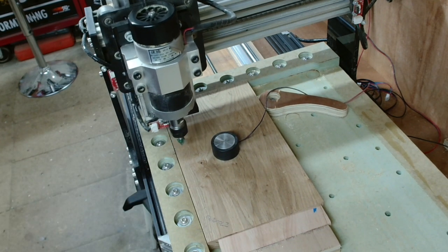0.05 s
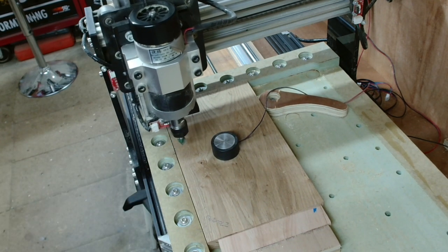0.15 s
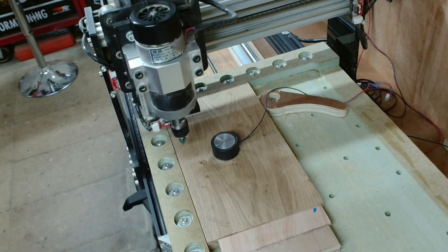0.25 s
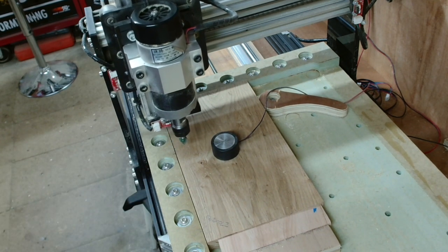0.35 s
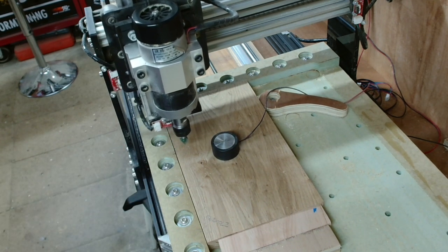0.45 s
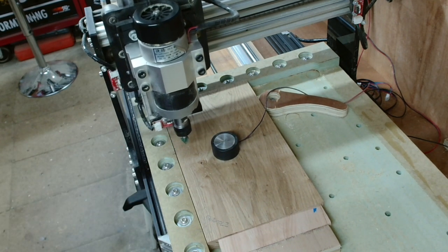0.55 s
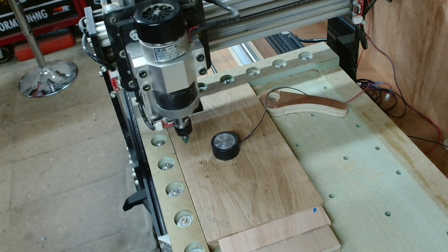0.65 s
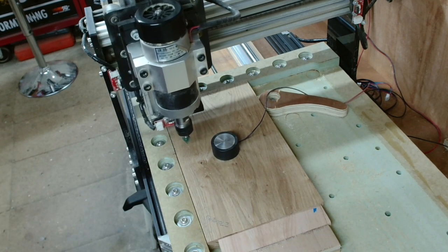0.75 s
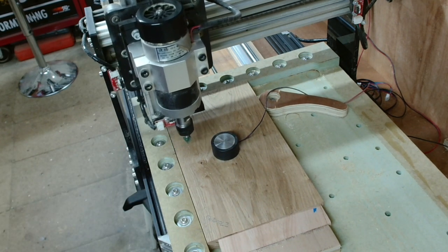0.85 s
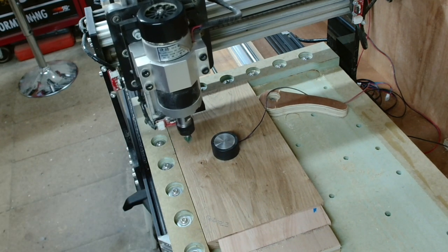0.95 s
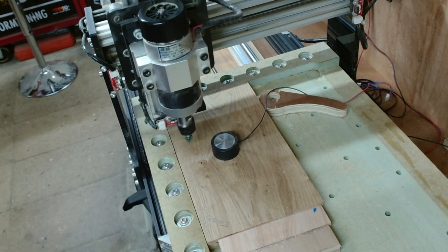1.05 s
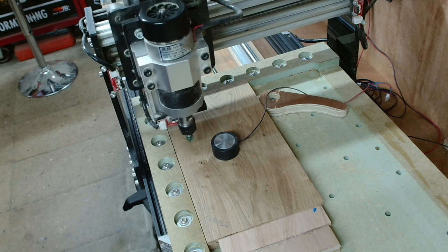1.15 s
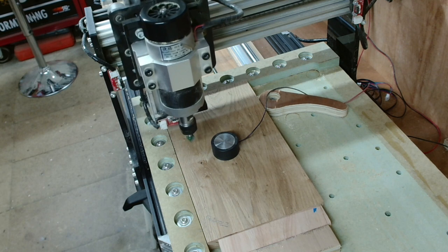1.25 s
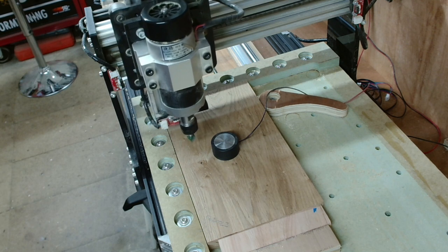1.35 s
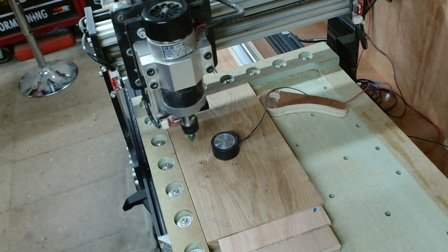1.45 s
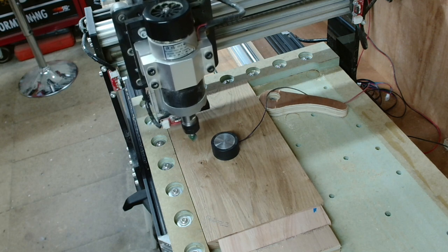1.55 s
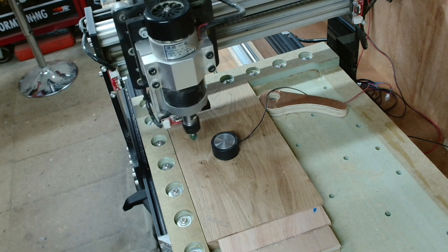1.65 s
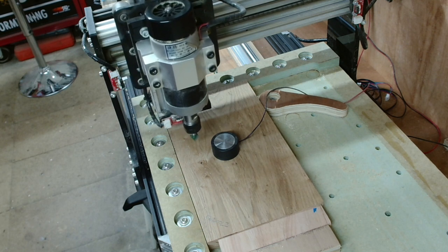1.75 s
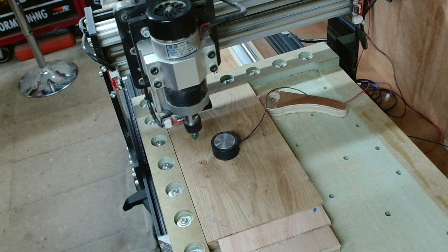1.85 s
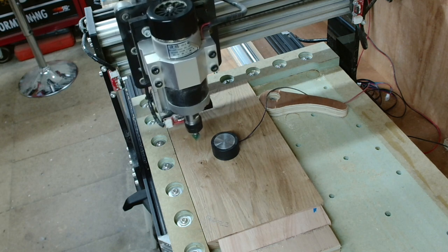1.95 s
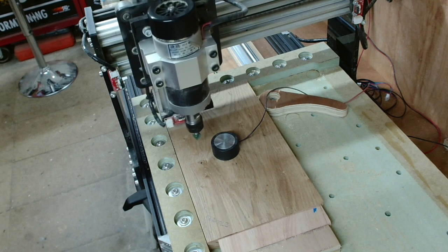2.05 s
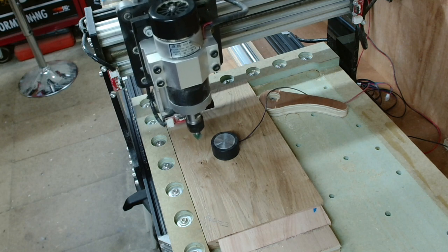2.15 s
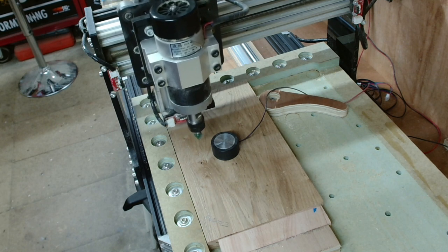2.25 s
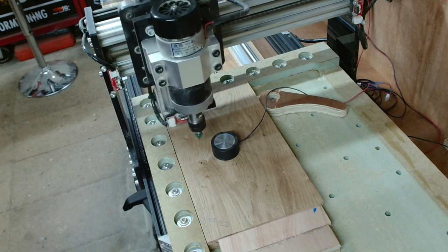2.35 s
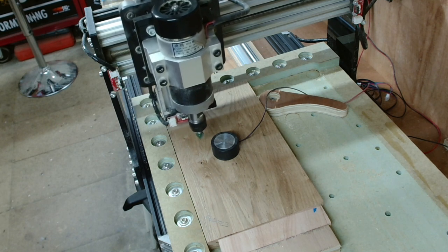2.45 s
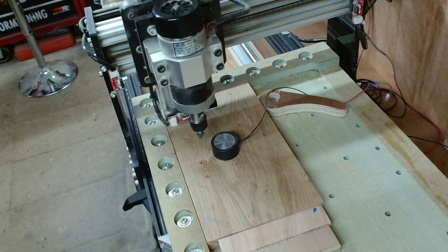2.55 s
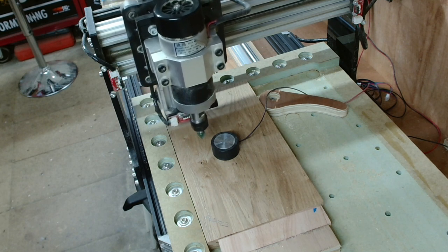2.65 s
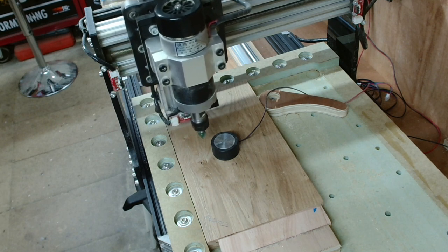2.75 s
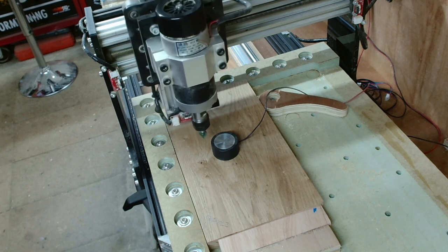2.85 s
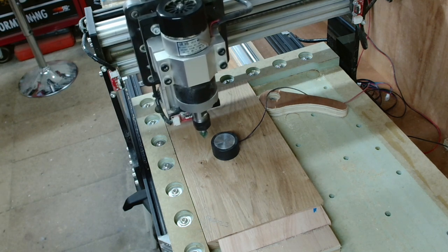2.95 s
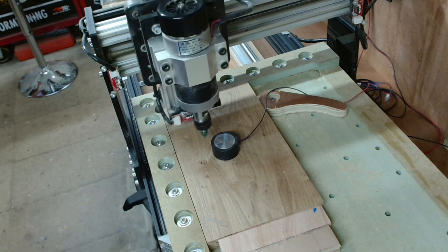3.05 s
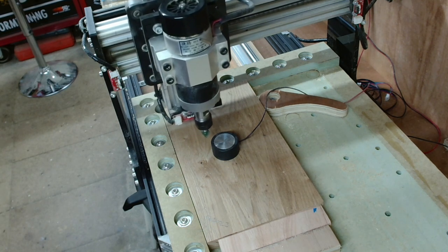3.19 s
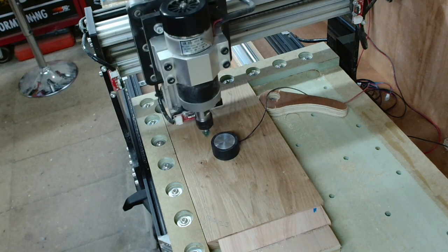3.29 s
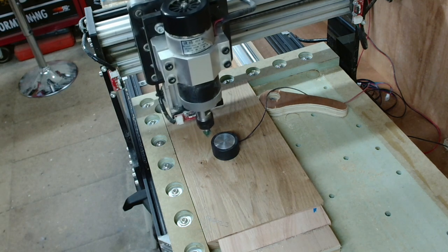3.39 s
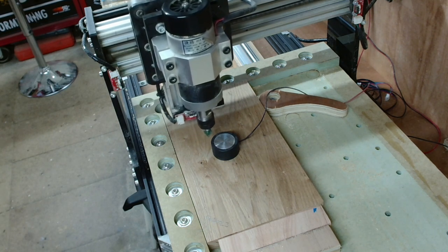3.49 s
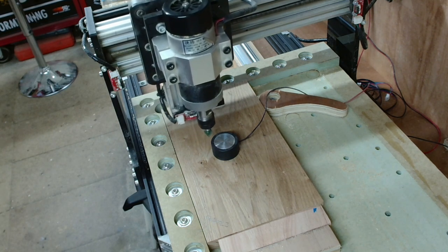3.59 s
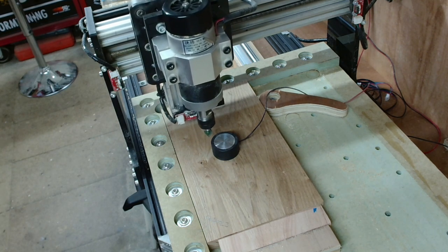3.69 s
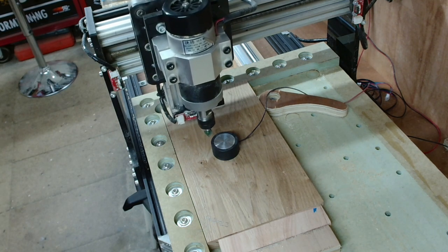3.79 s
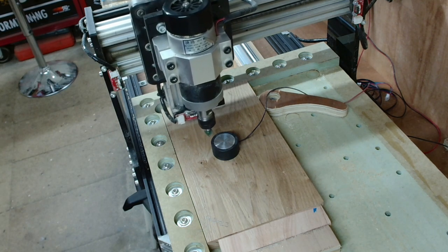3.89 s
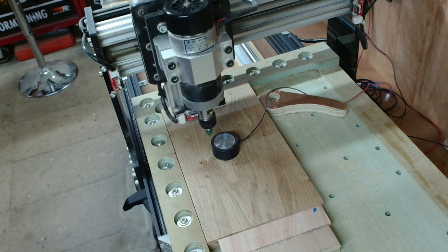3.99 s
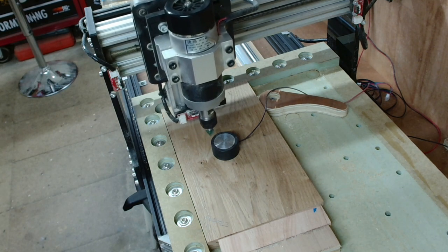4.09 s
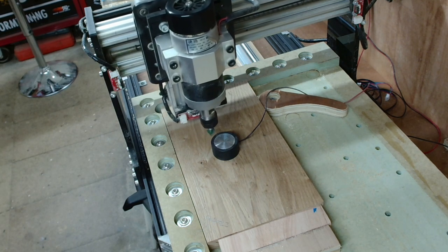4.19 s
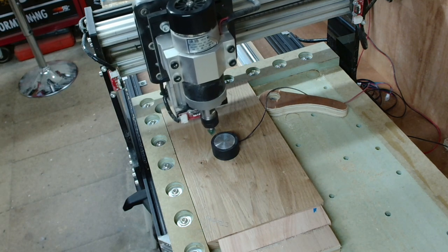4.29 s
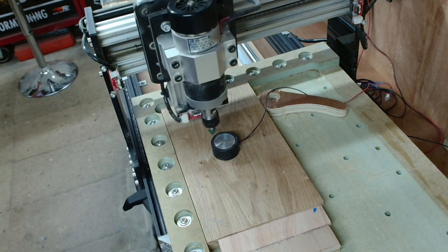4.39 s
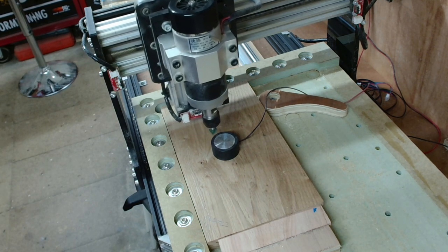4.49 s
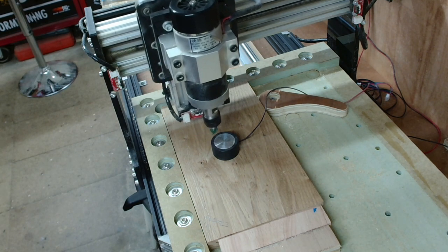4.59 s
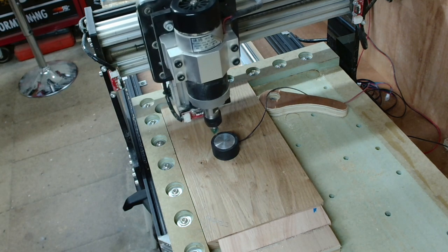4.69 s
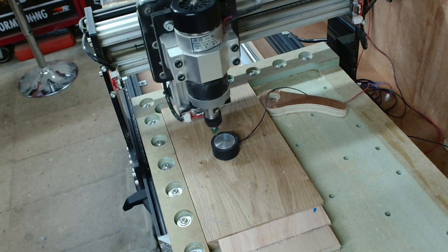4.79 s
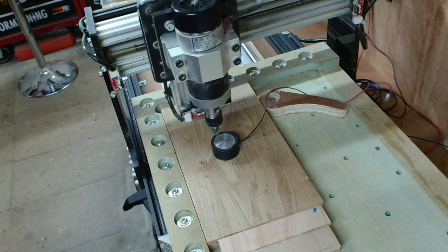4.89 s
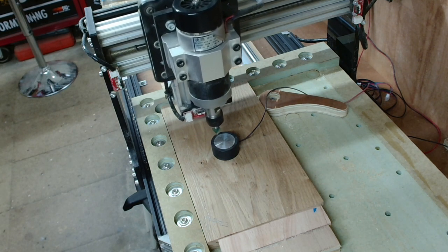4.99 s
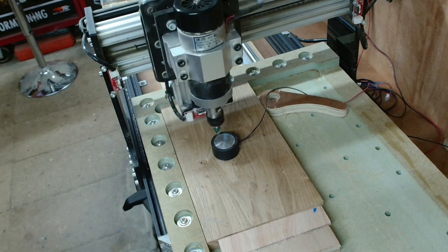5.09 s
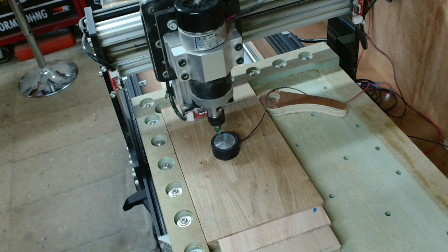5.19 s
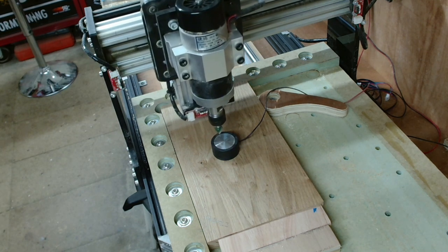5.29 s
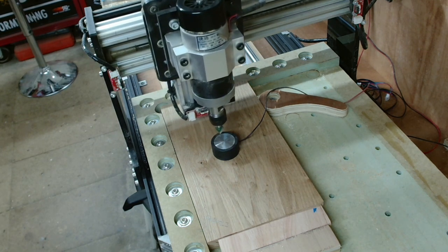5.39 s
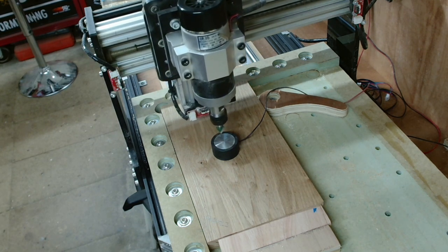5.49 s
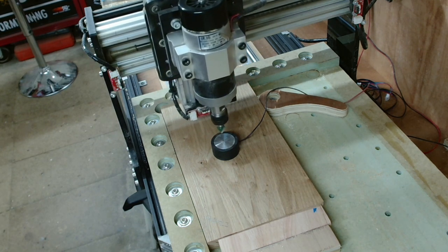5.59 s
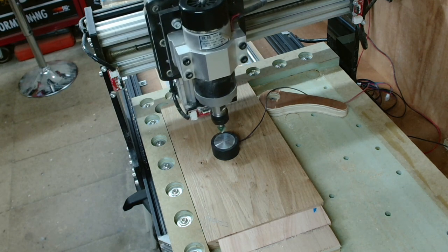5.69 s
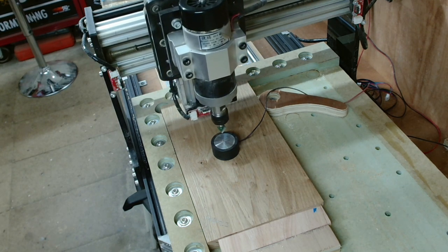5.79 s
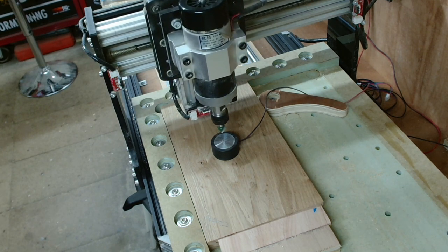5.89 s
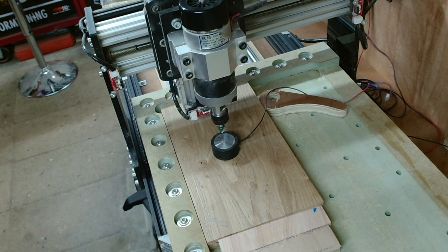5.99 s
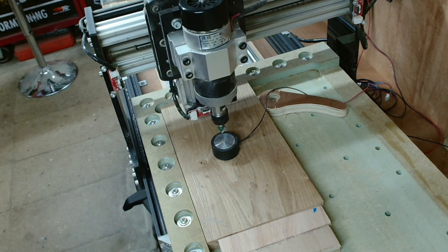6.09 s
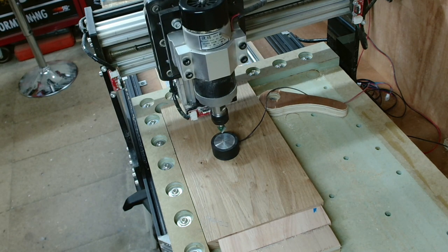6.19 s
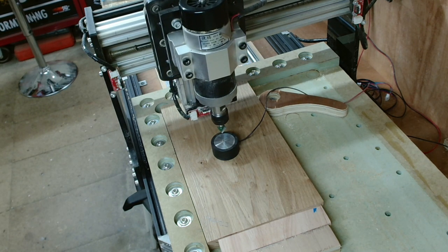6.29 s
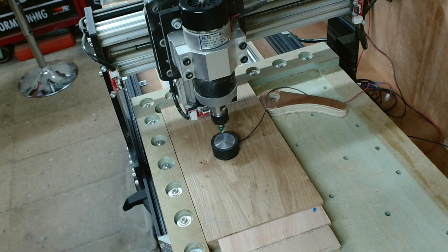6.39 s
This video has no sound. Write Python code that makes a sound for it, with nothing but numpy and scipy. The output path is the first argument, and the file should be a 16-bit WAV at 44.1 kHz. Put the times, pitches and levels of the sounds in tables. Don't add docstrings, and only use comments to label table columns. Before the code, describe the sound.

Close by in a workshop, a stepper motor holds a steady, low, nasal hum for about three and a half seconds while a carriage rumbles. It glides down to a stop, then runs two one-second jogs nearly back to back. After a pause, another begins and is cut off. Quiet key ticks and dull bench knocks accompany the moves, over faint fan whistle and room noise. Stereo microphone on the bench.

```python
import sys
import numpy as np
from scipy import signal
from scipy.fft import rfft, irfft, next_fast_len
from scipy.io import wavfile
from scipy.ndimage import uniform_filter1d

SR = 44100
rng = np.random.default_rng(int(sys.argv[2]) if len(sys.argv) > 2 else 0)


def magnitude_from_level(level_db):
    exponent = np.asarray(level_db, float) / 20
    return 10 ** exponent


def output_pcm(signal):
    pcm = np.clip(np.atleast_2d(signal).T, -1, 1) * 32767
    wavfile.write(sys.argv[1], SR, np.round(pcm).astype(np.int16))


N = 284004

# start_s, standstill_s
MOVES = [
    (-1.0, 0.023),
    (0.105, 3.627),
    (3.871, 4.808),
    (4.819, 5.757),
    (6.405, 7.4),
]
# order, level_db (rms), left_minus_right_db, left_lead_rad, extra_when_slow_db
TORQUE_RIPPLE = [(2, -37, -1.8, -.11, 1.5), (4, -15.1, -2.9, -.15, 1.5), (6, -53.5, -1.5, -.1, 6),
                 (8, -35, 2.4, .4, -4), (12, -59, .1, .1, 4.5), (16, -74, .1, .1, 6),
                 (20, -63, .1, -.5, -6), (24, -68.5, .1, -.3, -6), (40, -72, .1, -.5, -6)]
# pitch_hz, width_hz, level_db
FRAME_MODES = [(72, 40, -21), (110, 14, -22), (150, 16, -13), (166, 14, -3.5), (190, 16, -8),
               (218, 14, -13), (272, 26, -2.5), (305, 22, 0), (338, 24, -11), (375, 24, -10),
               (395, 12, -12), (425, 30, -18), (478, 30, -12), (500, 30, -7), (545, 50, -21),
               (590, 50, -23), (760, 200, -30)]
# pitch_hz, level_db (rms), width_hz
ROLLING_TONES = [(186.3, -39, 1.5), (272.5, -39, 4), (307.5, -34, 4), (378, -52, 2.5), (493.1, -41, 1.2),
                 (507, -48, 1.5)]
# multiple of the turn rate, level_db (rms)
FAN_ORDERS = [(7, -49), (12, -64), (13, -63), (14, -58), (15, -69), (16, -72), (17, -69), (20, -71),
              (21, -62), (22, -73), (27, -77), (28, -70), (29, -79), (35, -65), (41, -81), (42, -77),
              (43, -83)]
# pitch_hz, level_db (rms)
DRIVE_TONES = [(716, -62), (979.8, -62), (8000, -88), (9520, -96), (10650, -104), (13450, -108)]
# pitch_hz, lead_rad
LEFT_LEAD = [(0, 0), (950, 0.3), (1460, -1.0), (1810, -0.3), (2150, -3.0), (2670, -0.1), (3100, -1.5),
             (3360, 0.8), (3620, -1.1), (4220, -2.3), (4820, -1.6), (5170, -1.6), (5770, 0.1), (7670, -0.0)]
# pitch_hz, left_minus_right_db
STEREO_TILT = [(60, -1.0), (100, -1.0), (180, -1.5), (300, -2.0), (510, -1.5), (880, -1.0), (1500, 1.0),
               (2570, 0.0), (4400, 3.0), (7520, 0.0)]
# pitch_hz, likeness (0-1)
LIKENESS = [(40, .97), (500, .92), (1200, .55), (2200, .75), (4500, .7), (8000, .92), (12000, .97)]
# pitch_hz, level_db (per Hz)
ROOM_NOISE = [(12, -75), (22, -56.5), (58, -55.5), (85, -61), (110, -60), (165, -63), (230, -73),
              (310, -64), (400, -73), (500, -68), (620, -77), (700, -74), (900, -78), (1050, -78),
              (1250, -79.5), (1450, -87), (1800, -80), (2200, -84), (2500, -86), (2700, -83), (3000, -88),
            (3600, -88), (4200, -93), (5000, -97), (5450, -101), (5700, -92), (6500, -98), (7400, -106),
              (8200, -119), (9300, -129), (9600, -122), (11000, -127), (13200, -136), (13500, -130),
             (15200, -138), (16000, -160)]
# centre_s, level_db, length_s
SCRAPES = [
    (.9, 5, .045),
    (1.093, 6, .012),
    (2.33, 3, .03),
    (5.92, 3, .02),
]
# start_s, level_db (peak), pitch_hz
KNOCKS = [
    (-0.0049, -19, 165),
    (0.235, -27, 85),
    (3.789, -29, 54),
    (3.819, -30, 65),
    (5.914, -34, 503),
    (5.969, -30, 70),
    (6.02, -36, 320),
    (6.06, -37, 330),
    (6.115, -36, 310),
]
# pitch_hz, level_db (over the tick)
KEY_THUD = [(75, 11), (480, 6), (750, 2)]
# press_s, held_s, level_db (peak)
STROKES = [
    (0.0857, .1098, -44),
    (0.6978, .1157, -42),
    (1.0874, .1123, -41),
    (1.4057, .1063, -42),
    (3.8541, .1292, -42),
    (4.782, .1322, -43),
    (6.3834, .12, -42),
]
# pitch_hz, width_hz, level_db
KEY_MODES = [(900, 800, -7), (2500, 2500, -9), (4700, 900, -6), (6100, 900, -1), (7700, 700, -9),
             (8400, 400, -13), (11000, 700, -7), (14500, 1500, -1)]

CYCLE_HZ = 72.532
FAN_HZ = 160.53


def rms_one(x):
    return x / np.sqrt(np.mean(np.abs(x) ** 2) + 1e-20)


def low_pass(x, hz):
    return signal.sosfilt(signal.butter(4, hz, fs=SR, output="sos"), x)


def at_hz(points, hz):
    p = np.array(points, float)
    return np.interp(np.log(hz + 1), np.log(p[:, 0] + 1), p[:, 1])


def drift(rate_hz):
    r = np.exp(-80 * np.pi * rate_hz / SR)
    chance = rng.standard_normal(N // 40 + 2002)
    slow = signal.lfilter([1], [1, -2 * r, r * r], chance)[2000:]
    return np.interp(np.arange(N) / 40, np.arange(len(slow)), rms_one(slow))


def response(modes, hz):
    total = 0
    for k, (f, width, db) in enumerate(modes):
        damping = 1j * hz * width
        total = total + (-1) ** k * magnitude_from_level(db) * damping / (f * f - hz * hz + damping)
    return total


def through(x, modes):
    size = next_fast_len(N + SR // 4)
    hz = np.arange(size // 2 + 1) * SR / size
    return irfft(rfft(x, size) * response(modes, hz), size)[..., :N]


def placed(x, pan_db, lag):
    n = np.arange(N)
    left = magnitude_from_level(pan_db / 2) * np.interp(n - lag / 2, n, x)
    right = magnitude_from_level(-pan_db / 2) * np.interp(n + lag / 2, n, x)
    return np.array([left, right])


def feed():
    t = np.arange(N) / SR
    ramp_up_s, ramp_down_s = .063, .062
    speed = 0
    for start, stop in MOVES:
        speed = speed + np.clip(np.minimum((t - start) / ramp_up_s, (stop - t) / ramp_down_s), 0, 1)
    return speed


def stepper(speed):
    stairs = 7
    cycle = 2 * np.pi * CYCLE_HZ * np.cumsum(np.floor(speed * stairs) / stairs) / SR
    eighth_db = 2.3 - 1.0 * np.cumsum(speed) / SR
    slope = np.gradient(speed)
    load_db = -5.5 * (slope > 0) - 1 * (slope < 0)
    running = np.clip(speed / .3, 0, 1) * magnitude_from_level(uniform_filter1d(load_db, size=200))
    sides = np.array([[.5], [-.5]])
    force = 0
    for (order, db, pan_db, lead, slow_db), start in zip(TORQUE_RIPPLE, rng.random(len(TORQUE_RIPPLE))):
        order = round(order)
        level_db = db + slow_db * 2 * (1 - speed) + eighth_db * (order == 8)
        gain = magnitude_from_level(level_db) * np.sqrt(2) / abs(response(FRAME_MODES, order * CYCLE_HZ))
        phase = order * cycle + lead * sides + 2 * np.pi * start
        force = force + gain * magnitude_from_level(pan_db * sides) * np.sin(phase)
    return running * force


def carriage(speed):
    travel = 2 * np.pi * np.cumsum(speed) / SR
    ramping = uniform_filter1d(1. * (np.gradient(speed) != 0), size=600)
    rolling = magnitude_from_level(-7.5 + 1.5 * drift(6)) * speed ** .7 * rng.standard_normal(N)
    backlash = magnitude_from_level(-8) * ramping * speed ** .4 * rng.standard_normal(N)
    rumble = low_pass(rolling, 620) + low_pass(backlash, 1100)
    tones = 0
    for hz, db, width in ROLLING_TONES:
        waver = rms_one(1.7 + drift(width) + 1j * drift(width))
        tones = tones + magnitude_from_level(db) * np.sqrt(2) * np.real(waver * np.exp(1j * hz * travel))
    return placed(rumble, -2.5, 3.0), placed(speed ** 3.0 * tones, -2.5, 3.0)


def wide_noise(spectrum):
    size = next_fast_len(N)
    hz = np.arange(size // 2 + 1) * SR / size
    alike, lead = np.clip(at_hz(LIKENESS, hz), 0, 1), at_hz(LEFT_LEAD, hz) / 2
    summed = (1 + alike) * np.cos(lead) ** 2 + (1 - alike) * np.sin(lead) ** 2
    colour = magnitude_from_level(at_hz(spectrum, hz)) * np.sqrt(SR / 2 / summed)
    knots = np.arange(0, SR / 2 + 50, 35.)
    ripple_db = 3.5 * np.interp(hz, knots, rng.standard_normal(len(knots))) * (hz > 600)
    mid, side = rfft(rng.standard_normal((2, size))) * colour * rms_one(magnitude_from_level(ripple_db))
    mid, side = np.sqrt(1 + alike) * mid, np.sqrt(1 - alike) * side
    turn = np.exp(1j * lead) * magnitude_from_level(at_hz(STEREO_TILT, hz) / 2)
    return irfft([(mid + side) * turn, (mid - side) / turn], size)[:, :N]


def room_and_hand():
    room = wide_noise(ROOM_NOISE) * magnitude_from_level(.7 * drift(6))
    swells = SCRAPES + [(press, 1.8, .15) for press, _, _ in STROKES]
    t = np.arange(N) / SR
    hand_db = sum(db * np.exp(-((t - s) / length) ** 2) for s, db, length in swells)
    middle = signal.sosfilt(signal.butter(2, [900, 6500], "band", fs=SR, output="sos"), room)
    return room + (magnitude_from_level(hand_db) - 1) * middle


def fan_whistle():
    turns = 2 * np.pi * np.cumsum(1 + .0007 * drift(3.0)) / SR
    out = 0
    for hz, db in [(round(k) * FAN_HZ, db) for k, db in FAN_ORDERS] + DRIVE_TONES:
        lead = at_hz(LEFT_LEAD, hz) / 2 * np.array([[1], [-1]])
        gain = magnitude_from_level(db + .6 * drift(12)) * np.sqrt(2) / max(np.cos(lead[0, 0]), .4)
        out = out + gain * np.sin(hz * turns + lead + 2 * np.pi * rng.random())
    return out * magnitude_from_level([[-.8], [.8]])


def bench_knocks():
    thuds = [(press, db + more_db, hz) for press, _, db in STROKES for hz, more_db in KEY_THUD]
    settles = [(stop + .027, -28, 77) for _, stop in MOVES[:-1]]
    kicks = [(start + .011, -27, 320) for start, _ in MOVES[1:]]
    t = np.arange(SR // 8) / SR
    push = t / .006 * np.exp(1 - t / .006)
    out = np.zeros(N + 2 * SR)
    for s, db, hz in KNOCKS + thuds + settles + kicks:
        out[SR + round(s * SR):][:len(t)] += magnitude_from_level(db) * push * np.sin(2 * np.pi * hz * t)
    return placed(out[SR:SR + N], -1.5, 2.5)


def keys():
    t = np.arange(SR // 8) / SR
    rattle, ring = np.zeros((2, N + SR))
    rebound = .12 * np.exp(-((t - .022) / .004) ** 2)
    shape = np.exp(-t / .008) + .2 * np.exp(-t / .025) + rebound
    shape = shape * (1 - np.exp(-t / .0012))
    for press, held, db in STROKES:
        # s, extra dB, ring dB
        for s, more_db, ring_db in (press, 0, -1.5), (press + held, 0.1, 1.5):
            burst = magnitude_from_level(db + more_db) * shape * rng.standard_normal(len(t))
            rattle[round(s * SR):][:len(t)] += burst
            ring[round(s * SR):][:len(t)] += burst * magnitude_from_level(ring_db)
    tick = magnitude_from_level(8) * through(rattle[:N], KEY_MODES) + magnitude_from_level(9) * through(ring[:N], [(7000, 350, 0)])
    return placed(low_pass(tick, 7600), -.8, .6)


def scene():
    speed = feed()
    rumble, tones = carriage(speed)
    machine = through(stepper(speed) + rumble, FRAME_MODES) + tones
    return machine + room_and_hand() + fan_whistle() + bench_knocks() + keys()


def top_cut(x):
    return signal.sosfilt(signal.butter(12, 15350, fs=SR, output="sos"), x)


def record(dry):
    return top_cut(dry)


dry = scene()
out = record(dry)
output_pcm(out)
```